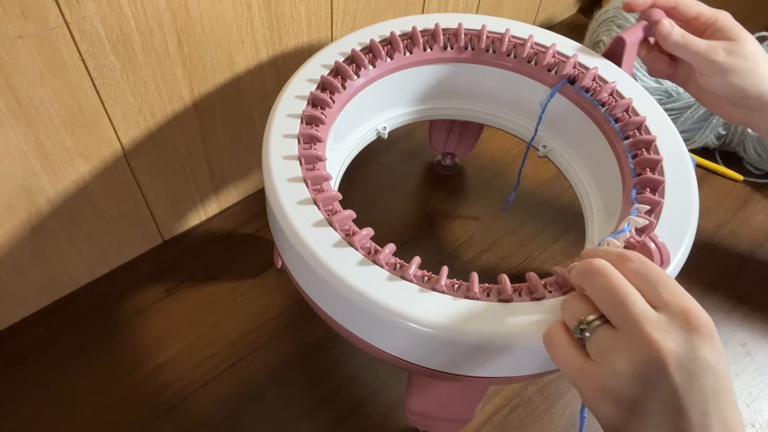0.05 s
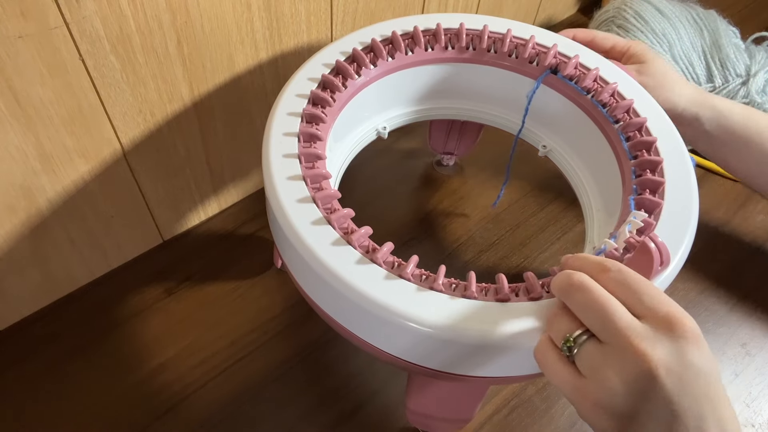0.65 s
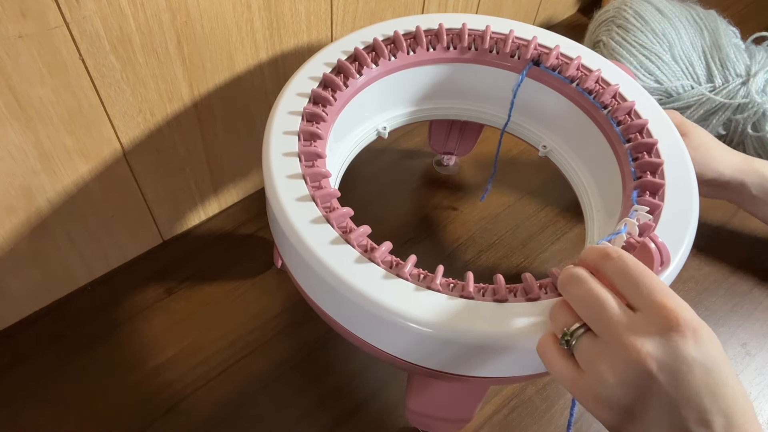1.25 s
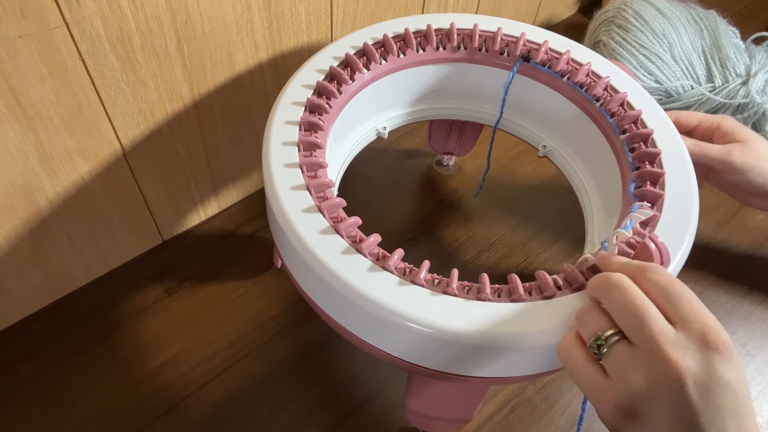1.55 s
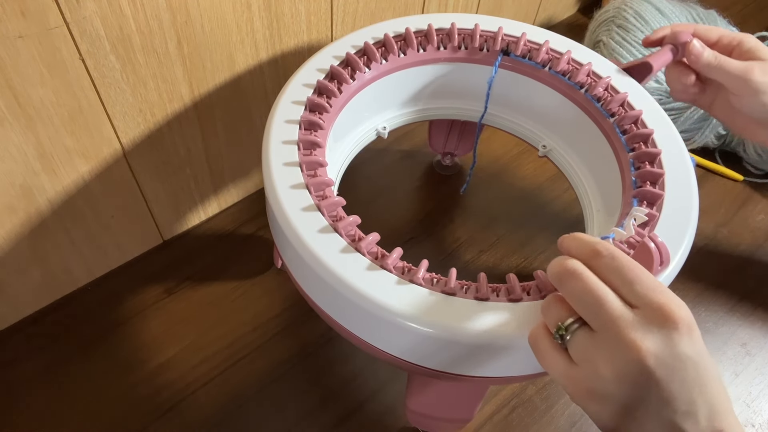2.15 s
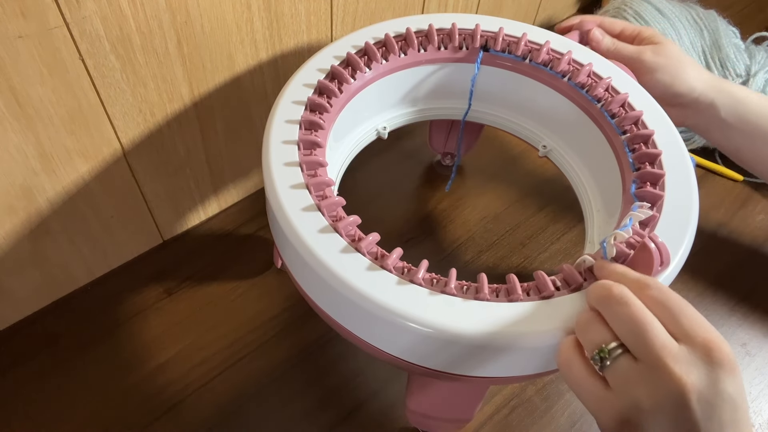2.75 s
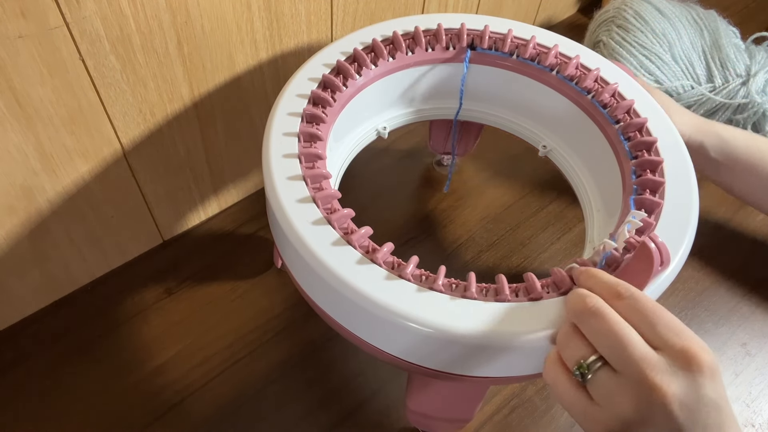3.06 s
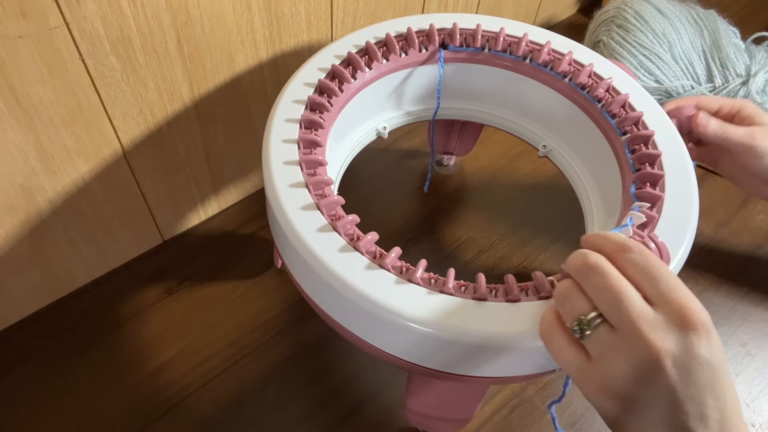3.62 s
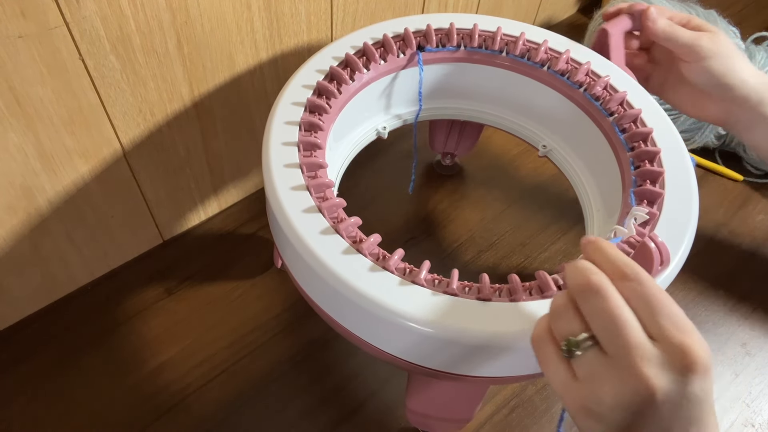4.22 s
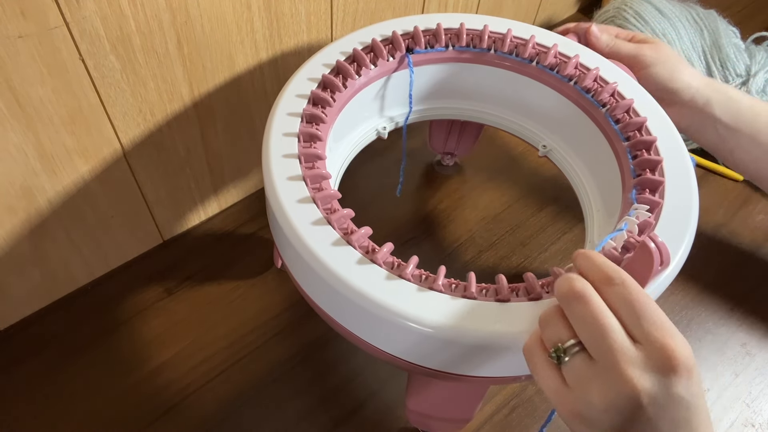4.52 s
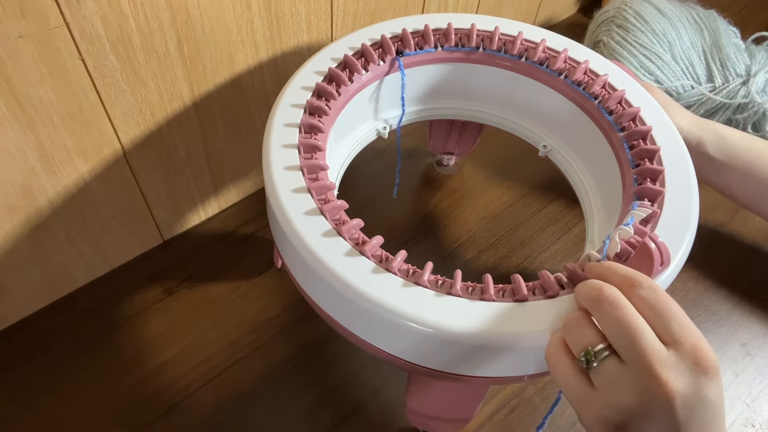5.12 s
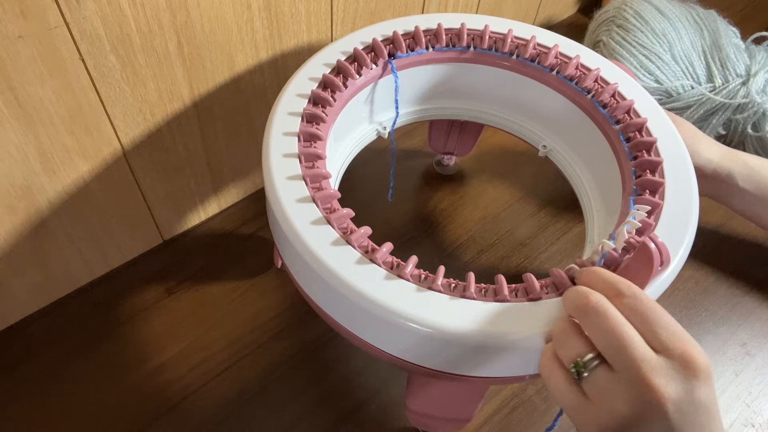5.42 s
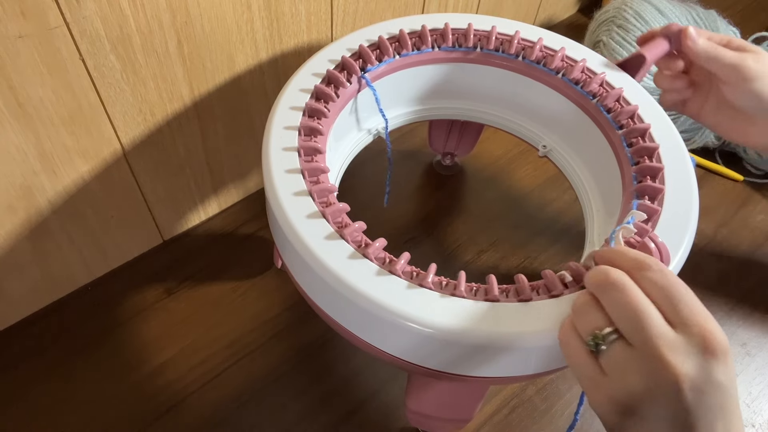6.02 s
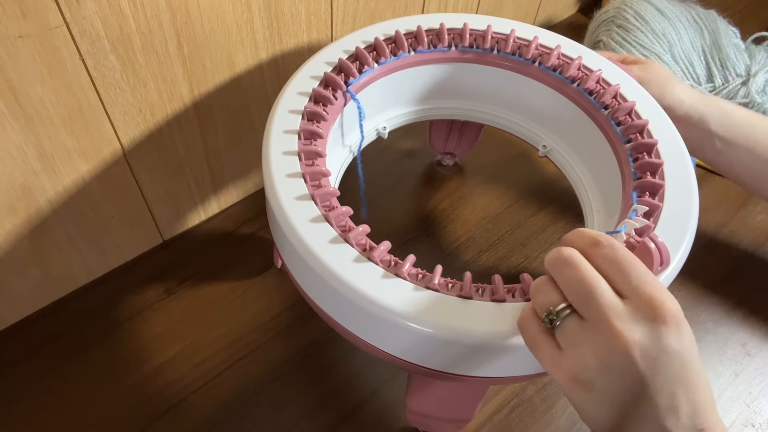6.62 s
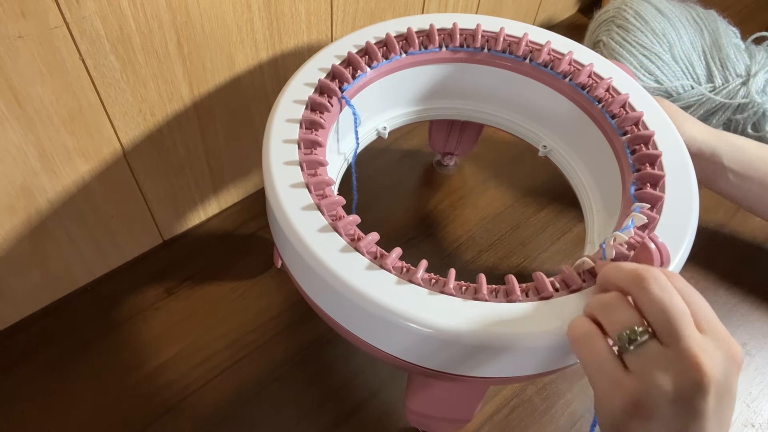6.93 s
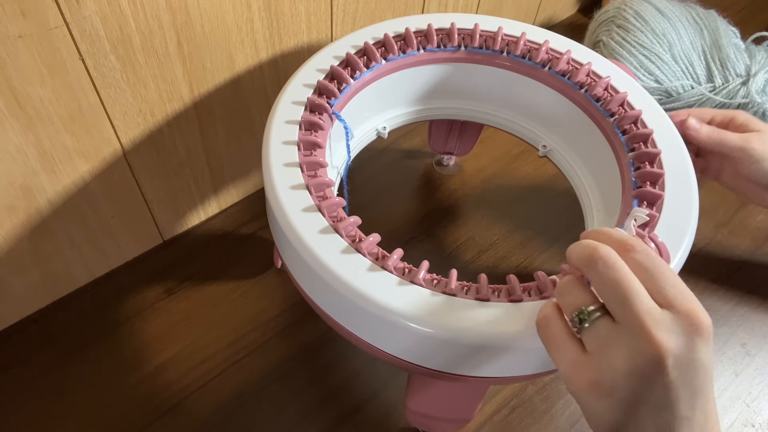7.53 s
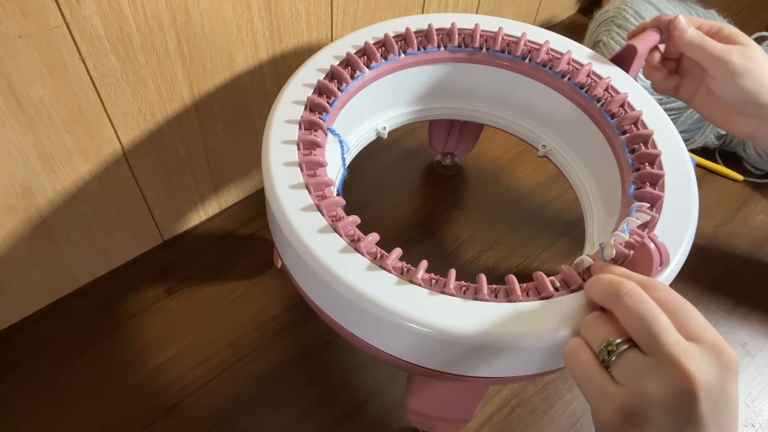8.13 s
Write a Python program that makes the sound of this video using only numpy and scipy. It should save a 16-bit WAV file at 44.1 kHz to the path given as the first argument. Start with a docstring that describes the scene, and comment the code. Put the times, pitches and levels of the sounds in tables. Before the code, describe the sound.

A round plastic knitting machine is cranked slowly, heard close in a small, quiet room with a short, dull echo. Light, sharp needle clicks come irregularly throughout, each with a tiny ring and bounce, mixed with duller hollow knocks from loose parts. A click opens at 0.1 seconds, followed by sparse taps, a quick cluster at 1.6 and a snap at 2.3. A busier run lasts from 2.8 to 3.7, with a strong click at 3.3. Small knocks rattle around 4.3. The turning almost stalls near 4.9, then clicks bunch between 5.5 and 6, followed by dull taps. The loudest snaps land at about 7 and 7.9 seconds, with a last double click at 8.2. Soft low thumps occur as the frame rocks on the wooden floor. Underneath run faint plastic rubbing, hiss and gear rumble, with slight yarn scraping strongest around 6.6 seconds.

```python
"""A small, quiet room, where a round plastic knitting machine is cranked slowly on a wooden floor.
Needles snap over the cam (the ramp that lifts them) and knock in their slots. Loose parts knock dully,
and the frame rocks on its legs with soft thumps. Underneath, the ring of needles rubs round
in the hollow shell and yarn scrapes over the hooks."""
import sys
import numpy as np
from scipy import signal
from scipy.fft import rfft, irfft, next_fast_len
from scipy.io import wavfile
from scipy.ndimage import uniform_filter1d

SR = 44100
rng = np.random.default_rng(int(sys.argv[2]) if len(sys.argv) > 2 else 0)


def materialize(psi):
    """Save the field psi as 16-bit PCM at rate SR to the path in sys.argv[1].

    A 1-D psi becomes a single channel; in a 2-D psi each row is a channel.
    """
    bounded = np.clip(np.atleast_2d(psi).T, -1, 1)
    quanta = np.round(bounded * 32767).astype(np.int16)
    wavfile.write(sys.argv[1], SR, quanta)


N = 364707
HIT_SIZE = 8192  # samples in one blow

# needles snap over the cam; the last three columns shape the tone:
# (time [s], level [dB], low weight [dB], middle clack [dB], high sharpness [dB])
NEEDLE_SNAPS = [(0.127, -26, -15.5, -9, -19.5), (0.243, -41, -19, -11, -26), (0.643, -61, -7, -21, -4.5),
                (0.856, -42.5, -12.5, -13.5, -20.5), (0.957, -36.5, -14, -18.5, -20.5),
                (1.591, -35, -18, -18, -21), (1.601, -35, -15, -11, -25), (1.609, -26.5, -27, -9, -15),
                (1.617, -28.5, -36, -8.5, -5.5), (2.024, -45.5, -20.5, -11.5, -27),
                (2.321, -30.5, -16, -8, -10), (2.438, -41, -17.5, -14, -27),
                (2.788, -42.5, -11.5, -14, -19), (2.847, -31.5, -23, -14, -32),
                (2.87, -30.5, -27, -15, -19), (2.877, -29, -20, -8, -7), (2.903, -34.5, -11, -16, -11.5),
                (3.007, -28, -39, -13, -16.5), (3.34, -24, -22.5, -14, -8), (3.611, -29.5, -22, -12, -22),
                (3.621, -30.5, -32, -15.5, -7.5), (3.731, -32, -14.5, -18, -19.5),
                (3.913, -36.5, -17, -16, -36), (4.202, -38, -30, -15, -21), (4.672, -35, -24, -11, -31),
                (4.971, -33, -13, -14, -23), (5.054, -39.5, -9.5, -19.5, -25.5),
                (5.119, -55.5, -23, -2.5, -22), (5.552, -36.5, -13, -15, -25), (5.636, -31, -23, -20, -30),
                (5.665, -32, -20, -13.5, -17.5), (5.943, -29.5, -21.5, -16, -20.5),
                (5.982, -27.5, -21, -11.5, -19), (5.993, -29, -20, -12, -8),
                (6.762, -41.5, -19, -16.5, -18.5), (6.964, -22, -15, -8, -9.5),
                (7.877, -40.5, -18, -5, -34), (7.94, -18, -19, -6.5, -12), (8.149, -26.5, -21, -14, -19.5),
                (8.161, -27.5, -17, -14.5, -12.5)]
# loose parts knock in the ring and gears: (time [s], level [dB], centre pitch [Hz])
LOOSE_KNOCKS = [(0.156, -40, 1250), (0.286, -36.5, 1270), (0.388, -48.5, 912), (0.508, -50.5, 388),
                (0.62, -52.5, 398), (0.667, -51.5, 1310), (0.713, -53, 926), (1.091, -47, 1010),
                (1.472, -47, 606), (1.524, -43.5, 410), (1.923, -53, 440), (2.135, -44.5, 1170),
                (2.703, -48.5, 872), (2.747, -43, 1270), (2.827, -39, 600), (2.91, -38, 1170),
                (3.197, -48.5, 1100), (3.252, -41.5, 1040), (3.282, -40.5, 1230), (3.445, -43.5, 626),
                (3.499, -48, 371), (4.229, -48, 1300), (4.256, -44, 1280), (4.276, -41, 1310),
                (4.293, -40.5, 926), (4.313, -39.5, 1110), (4.405, -46, 1650), (4.548, -47.5, 1270),
                (4.938, -52, 1120), (5.775, -40, 397), (5.959, -39, 1030), (6.258, -43.5, 930),
                (6.335, -49, 1300), (6.397, -48.5, 1550), (6.473, -49, 1130), (6.533, -44.5, 1090),
                (6.622, -38.5, 1110), (6.797, -44.5, 1100), (7.097, -53.5, 1170), (7.341, -50, 1250),
                (7.414, -41, 695), (7.546, -42.5, 1330), (7.597, -37, 636), (7.792, -47.5, 1190)]
# the frame rocks on its legs: (time [s], level [dB], pitch of the push [Hz])
FRAME_THUMPS = [(0.146, -40, 77.5), (0.286, -46.5, 132), (0.506, -59, 113), (0.849, -50, 86.1),
                (0.964, -45, 129), (1.598, -41.5, 137), (2.142, -57, 88.8), (2.908, -38, 120),
                (3.287, -43.5, 143), (3.73, -41, 143), (4.231, -42, 99.6), (4.66, -49, 116),
                (5.054, -44, 127), (5.95, -42.5, 78.1), (6.534, -52, 132), (7.429, -60, 91.5),
                (7.56, -58, 78.1), (7.946, -45, 127)]


def needles(gain_db=27, body_db=-6.5, drag_s=0.0065, drag_top_hz=4500, lead_s=0.0004,
            ring_db=-21, ring_t60=0.06, bounce_db=-18, bounce_s=0.022):
    """Each needle drags dully on the cam, snaps free, rings briefly and bounces twice in its slot."""
    # the tones a needle rings with: (pitch [Hz], level [dB])
    needle_tones = [(2122, 3), (2405, 3.5), (2613, -4.5), (3054, 0), (3461, 2.5), (4369, -3), (5241, -5),
                    (6493, -12.5)]
    # the tone colour all snaps share: (frequency [Hz], level [dB])
    snap_colour = [(100, -9), (280, -10), (450, 1.5), (750, -3), (1250, 1), (2000, -3.5), (3000, -3.5),
                   (5000, -5.5), (8000, -1.5), (14000, 0.5), (16000, -17)]
    out, hz, t = np.zeros((2, N)), bins(HIT_SIZE), np.arange(HIT_SIZE) / SR
    tone_hz, tone_db = np.transpose(needle_tones)[:, :, None]
    drag_db = -17 - 20 * np.log10(1 + (hz / drag_top_hz) ** 2)
    for s, level_db, weight_db, clack_db, sharp_db in NEEDLE_SNAPS:
        balance = [(410, weight_db + 2.5), (590, weight_db + 9), (850, body_db), (1700, body_db),
                   (2800, clack_db + 7), (7000, sharp_db + 3), (13000, sharp_db - 4)]
        colour_db = gain_db + level_db + at_hz(balance, hz) + at_hz(snap_colour, hz)
        add(out, s - drag_s, contact(colour_db + drag_db, rattle_s=0.0052, crack_s=0.0037))
        add(out, s - lead_s, contact(colour_db, rattle_s=0.0045, crack_s=0.0026))
        chance_db = 3.5 * rng.standard_normal((2, len(needle_tones), 1))
        strength = from_db(level_db + clack_db + ring_db + tone_db + chance_db)
        ringing = (strength * np.sin(2 * np.pi * tone_hz * t)).sum(1)
        add(out, s, ringing * die_away(t, ring_t60))
        for k, gap in enumerate(np.cumsum(bounce_s * rng.uniform(0.59, 1.0, 2))):
            add(out, s + gap, contact(colour_db + bounce_db - 7 * k, rattle_s=0.005, crack_s=0.0088))
    return out


def knocks(gain_db=25, lead_s=0.00045, settle_db=-11, settle_s=0.012):
    """Loose parts of the ring and gears knock dully, then settle with a softer second touch."""
    out, hz = np.zeros((2, N)), bins(HIT_SIZE)
    for s, level_db, centre_hz in LOOSE_KNOCKS:
        octaves = np.log2((hz + 1) / centre_hz)
        hump_db = np.minimum(5.5 * octaves, -13 * octaves)  # strongest at the centre pitch
        colour_db = gain_db + level_db + hump_db
        add(out, s - lead_s, contact(colour_db, rattle_s=0.0035))
        add(out, s + settle_s * rng.uniform(0.82, 1.2), contact(colour_db + settle_db, rattle_s=0.004))
    return out


def contact(colour_db, rattle_s, crack_s=0.0032, travel_s=0.024, bend_hz=290, split_hz=2000,
            far_db=-7, left_lag_s=0.000146):
    """One blow: a sharp crack straight from the spot, and echoes that run both ways round the ring."""
    # how alike left and right are: (frequency [Hz], likeness [0-1])
    likeness = [(100, 1), (500, 0), (1200, 0.88), (2200, 0.36), (5000, 0.35), (8000, 0), (15000, 0.5)]
    t, hz = np.arange(HIT_SIZE) / SR, bins(HIT_SIZE)
    decays = np.reshape([crack_s, rattle_s, rattle_s], (3, 1, 1))
    bursts = rfft(rng.standard_normal((3, 2, HIT_SIZE)) * np.sqrt(t) * np.exp(-t / decays))
    bursts = bursts / np.sqrt(uniform_filter1d(abs(bursts) ** 2, size=90))  # even out the tone
    crack, near, far = [stereo(pair, likeness, hz) for pair in bursts]
    # the crack reaches the left side of the microphone later
    crack = crack * np.exp(-2j * np.pi * hz * left_lag_s * np.array([[1], [0]]))
    # low bending waves travel slowly, so the bass comes late, and twice as late the far way round
    delay = np.exp(-2j * np.pi * travel_s * bend_hz * np.arctan(hz / bend_hz))
    bending = near * delay + from_db(far_db) * far * delay ** 2
    blend = (hz * crack + split_hz * bending) / np.hypot(hz, split_hz)  # the crack takes the highs
    fade = np.cos(np.pi / 2 * t / t[-1]) ** 2
    return irfft(blend * from_db(colour_db)) * fade


def frame(gain_db=2.5, rise_s=0.014, nudge_hz=135, nudge_db=-11, nudge_lag_s=0.00782):
    """A shift of weight sets the frame swinging with a low thump; every knock nudges it too."""
    # the tones of the frame on its legs: (pitch [Hz], level [dB], time to fade by 60 dB [s])
    frame_tones = [(53.5, -21, 0.4), (65.2, -4.5, 0.15), (93.5, -6.5, 0.25), (127.5, -4.5, 0.15),
                   (156.3, -5, 0.12), (176, -9.5, 0.057), (246, -11.5, 0.077)]
    out, t = np.zeros((2, N)), np.arange(SR // 2) / SR
    hz, tone_db, t60 = np.transpose(frame_tones)[:, :, None]
    nudges = [(s + nudge_lag_s, db + nudge_db, nudge_hz) for s, db, _ in LOOSE_KNOCKS]
    for s, level_db, push_hz in list(FRAME_THUMPS) + nudges:
        octaves_away = abs(np.log2(hz / push_hz))
        strength = from_db(tone_db - 5 * octaves_away + 3.5 * rng.standard_normal(hz.shape))
        swing = np.sin(2 * np.pi * (hz * t + rng.random(hz.shape))) * die_away(t, t60)
        thump = (strength * swing).sum(0) * (1 - np.exp(-t / rise_s))
        add(out, s, from_db(level_db + gain_db) * thump)
    return out * from_db([[-0.5], [0.5]])  # a little to the right


def turning(rub_db=-67, hiss_db=-71, rumble_db=-67):
    """Sliding plastic rubs and hisses, and the gears rumble; blows stir up the rub and the rumble."""
    # the tone colours of the three noises: (frequency [Hz], level [dB])
    rub_colour = [(100, 8.5), (260, -14.5), (450, -6.5), (750, -1.5), (1300, 3.5), (2000, -1.5),
                  (3200, -1.5), (4500, -10.5), (7000, -43), (15000, -16)]
    hiss_colour = [(2000, 0), (4500, 6), (6500, 5), (8500, 8.5), (10500, -5), (12500, 6), (14500, 8),
                   (15800, -24)]
    rumble_colour = [(22, -40), (35, -22.5), (55, 7.5), (75, -5.5), (95, -1.5), (130, 0), (190, -16),
                     (300, -20.5), (1000, -54)]
    # yarn catches on the hooks, and gear teeth touch:
    # (rate [per s], lowest pitch [Hz], highest pitch [Hz], boost over the rub [dB], spread [dB])
    yarn_ticks = (16, 1000, 3500, 35, 8.4)
    gear_taps = (10, 425, 750, 34.9, 5.5)
    slide_db = sliding()
    rub_gain = np.hypot(from_db(rub_db + slide_db), from_db(-34) * shaking(NEEDLE_SNAPS, swell_s=0.015))
    rumble_gain = np.hypot(from_db(rumble_db + 0.51 * slide_db),
                           from_db(-16) * shaking(FRAME_THUMPS, swell_s=0.036))
    rub = rub_gain * groove(friction(rub_colour, grain_db=4))
    hiss = from_db(hiss_db + 1.26 * slide_db) * groove(friction(hiss_colour, grain_db=2.5))
    rumble = rumble_gain * friction(rumble_colour, grain_db=0.7)
    ticks = faint_contacts(rub_db + slide_db, *yarn_ticks)
    taps = faint_contacts(rub_db + slide_db, *gear_taps)
    return rub + hiss + rumble + ticks + taps


def sliding(usual_db=-60):
    """How hard the ring slides, in dB above its usual level; it sinks wherever the ring stalls."""
    # how hard the ring slides round: (time [s], level [dB])
    effort = [(0.0, -60), (0.8, -68), (0.9, -62), (1.39, -65.5), (1.69, -60.6), (1.79, -65), (2.29, -65.5),
              (2.39, -59.5), (2.69, -65), (2.79, -56.4), (3.09, -61), (3.69, -57), (4.09, -65.5),
              (4.28, -55.5), (4.38, -63.5), (4.98, -60), (5.08, -71), (5.68, -55), (6.88, -63),
              (7.57, -55.5), (8.07, -62.5), (8.27, -58)]
    # the ring almost stops: (time [s], half length [s], level change [dB])
    stalls = [(0.677, 0.026, -9.5), (2.68, 0.047, -5.5), (4.882, 0.13, -15.5)]
    t = np.arange(N) / SR
    effort_db = np.interp(t, *np.transpose(effort)) - usual_db
    stall_db = sum(depth_db * np.exp(-((t - middle) / half) ** 4) for middle, half, depth_db in stalls)
    return effort_db + stall_db


def shaking(blows, swell_s):
    """Each blow shakes the machine: a gain that swells to the blow's level and dies away."""
    out, age = np.zeros((1, N)), np.arange(SR) / SR / swell_s
    for s, level_db, *_ in blows:
        add(out, s, from_db(level_db) * age * np.exp(1 - age))
    return out[0]


def friction(colour, grain_db):
    """Rubbing is countless tiny slips; a larger grain_db makes them more uneven."""
    # how alike left and right are: (frequency [Hz], likeness [0-1])
    likeness = [(60, 0.76), (130, 0.74), (300, 0.23), (700, 0.15), (1300, 0.89), (2400, 0.022),
                (5000, 0.053), (12000, 0.54)]
    slips = rng.standard_normal((2, N)) * from_db(grain_db * (drift(400) + drift(45)) / 2)
    hz = bins(N)
    spectrum = stereo(rfft(slips), likeness, hz) * from_db(at_hz(colour, hz))
    return rms_one(irfft(spectrum, N))


def faint_contacts(rub_db, per_s, low_hz, high_hz, gain_db, spread_db):
    """Small blows at random times, louder when the rubbing is louder."""
    out, hz = np.zeros((2, N)), bins(HIT_SIZE)
    draws = rng.random((400, 3))
    for when, pitch, size in draws[:int(per_s * N / SR)]:
        at = int(when * N)
        centre_hz = low_hz * (high_hz / low_hz) ** pitch
        hump_db = -17 * abs(np.log2((hz + 1) / centre_hz))
        level_db = rub_db[at] + gain_db + spread_db * (2 * size - 1)
        add(out, at / SR, contact(level_db + hump_db, rattle_s=0.0055))
    return out


def yarn(gain_db=-71.5):
    """Yarn scrapes over the hooks as the ring moves, louder when it is drawn tight."""
    # how tightly the yarn is drawn: (time [s], level change [dB])
    tightness = [(0.0, -18.5), (5.2, -3.5), (5.7, -8.5), (6.6, 1.5), (8.27, -12)]
    # the tone colour of the scrape: (frequency [Hz], level [dB])
    scrape_colour = [(1000, -35), (1900, -18), (2400, 4.5), (2900, 3), (3400, 0.5), (4200, -13.5),
                     (8000, -31)]
    drag_db = np.interp(np.arange(N) / SR, *np.transpose(tightness))
    return from_db(gain_db + sliding() + drag_db) * groove(friction(scrape_colour, grain_db=4))


def groove(x, t60=0.088, wet_db=-9):
    """The groove that the ring runs in rings briefly at many closely spaced pitches."""
    t = np.arange(HIT_SIZE) / SR
    echoes = rms_one(rng.standard_normal(HIT_SIZE) * die_away(t, t60)) / np.sqrt(HIT_SIZE)
    return rms_one(x + from_db(wet_db) * signal.fftconvolve(x, echoes[None], axes=1)[:, :N])


def shell(x):
    """The hollow shell lifts some pitches and weakens a few, differently toward each side."""
    # where the shell rings: (pitch [Hz], width [Hz], lift [dB], left minus right [dB])
    resonances = [(367.4, 85, 9.5, 3), (414.5, 37, 8.5, -4), (464, 18, -12, 4), (579, 45, 7, -10.5),
                  (739, 75, -4.5, -3), (934, 450, 5, 0), (1297, 133, 6.5, -1), (1600, 108, 5.5, -1.5),
                  (2160, 35, 4.5, -4), (2392, 74, 4.5, 0.5), (2626, 100, 4.5, 0.5), (3170, 230, 4, -2),
                  (3416, 69, 6, 5), (3677, 37, 5.5, -8), (4176, 350, 5, 5), (5214, 94, 3.5, 7),
                  (6580, 115, 1, 15), (10220, 1450, -2, -2.5)]
    size = next_fast_len(N + HIT_SIZE)
    hz, response = bins(size) + 1e-6, 1
    for centre_hz, width_hz, lift_db, pan_db in resonances:
        resonance = 1 / (1 + 1j * (hz ** 2 - centre_hz ** 2) / (hz * width_hz))
        lift = from_db([[lift_db + pan_db / 2], [lift_db - pan_db / 2]])
        response = response * (1 + (lift - 1) * resonance)
    return irfft(rfft(x, size) * response)[:, :N]


def room(x, t60=0.27, wet_db=-15, echo_db=-25, echo_s=0.023, wall_hz=6000):
    """The small room adds a short, dull tail and one scattered echo off the wall."""
    t = np.arange(SR // 2) / SR
    tail = rng.standard_normal((2, len(t))) * die_away(t, t60) * (t > 0.006)
    echo = rng.standard_normal((2, len(t))) * np.exp(-((t - echo_s) / 0.009) ** 2)
    response = (from_db(wet_db) * rms_one(tail) + from_db(echo_db) * rms_one(echo)) / np.sqrt(len(t))
    response = signal.sosfilt(signal.butter(1, wall_hz, fs=SR, output="sos"), response)
    return x + signal.fftconvolve(x, response, axes=1)[:, :N]


def from_db(db):
    """Turn decibels into a gain to multiply by."""
    return 10 ** (np.asarray(db) / 20)


def rms_one(x):
    """Scale a sound to an average strength (rms) of 1."""
    return x / np.sqrt(np.mean(x ** 2) + 1e-20)


def die_away(t, t60):
    """A fade that falls by 60 dB in t60 seconds."""
    return np.exp(-np.log(1000) * t / t60)


def at_hz(points, hz):
    """Read between (frequency, value) points, with every octave equally wide."""
    known_hz, values = np.transpose(points)
    return np.interp(np.log(hz + 1e-9), np.log(known_hz), values)


def bins(size):
    """The frequencies in the spectrum of a sound this many samples long."""
    return np.fft.rfftfreq(size, 1 / SR)


def add(out, s, sound):
    """Mix a sound in at s seconds."""
    start = max(round(s * SR), 0)
    out[:, start:start + sound.shape[-1]] += sound[..., :N - start]


def stereo(pair, likeness, hz):
    """Two unrelated spectra become left and right: one is shared, the other is added with opposite signs."""
    alike = np.clip(at_hz(likeness, hz), -1, 1)
    return np.sqrt((1 + alike) / 2) * pair[0] + np.sqrt((1 - alike) / 2) * pair[1] * [[1], [-1]]


def drift(per_s):
    """A random wander that heads for a new value per_s times a second."""
    knots = rng.standard_normal(4000)
    return np.interp(np.arange(N) / SR * per_s, np.arange(len(knots)), knots)


def scene():
    """Snaps and knocks echo in the room; the shell colours everything but the frame's thumps."""
    blows = room(needles() + knocks())
    return shell(blows + turning() + yarn()) + frame()


def record(dry, cutoff_hz=16000):
    """The microphone has a dip in the treble, and the very top is cut off."""
    # the microphone's tone colour: (frequency [Hz], gain [dB])
    treble_dip = [(9500, 2), (10200, -15), (11200, -24), (11900, 1.5)]
    coloured = irfft(rfft(dry) * from_db(at_hz(treble_dip, bins(N))), N)
    return signal.sosfilt(signal.ellip(10, 0.2, 80, cutoff_hz, fs=SR, output="sos"), coloured)


dry = scene()
out = record(dry)
materialize(out)
```